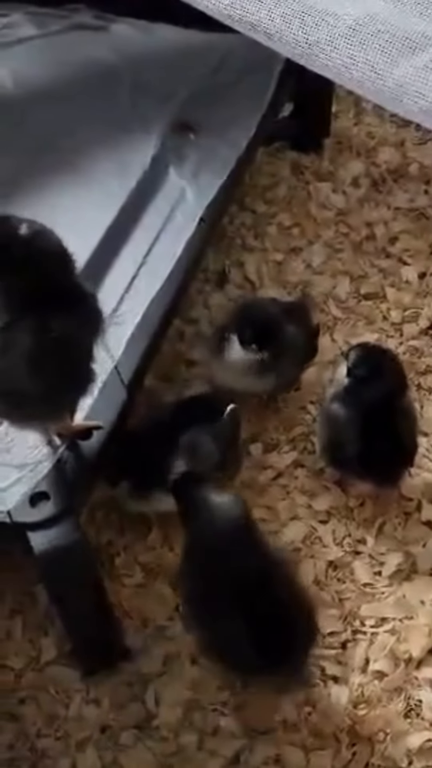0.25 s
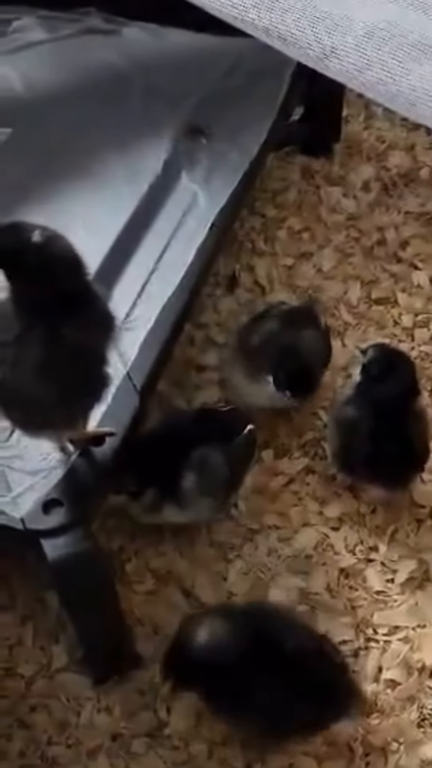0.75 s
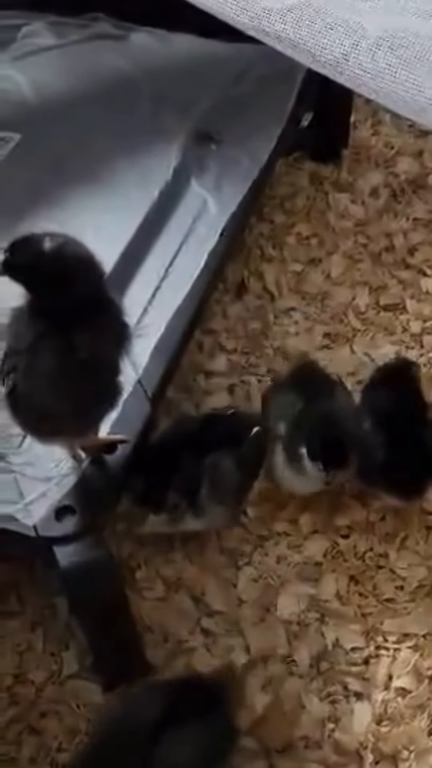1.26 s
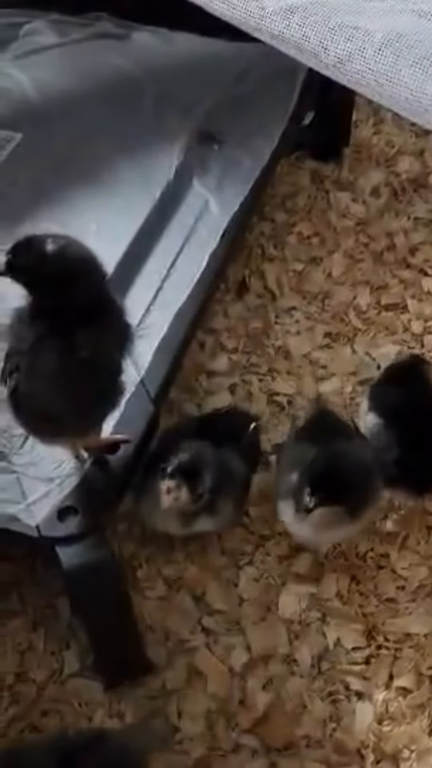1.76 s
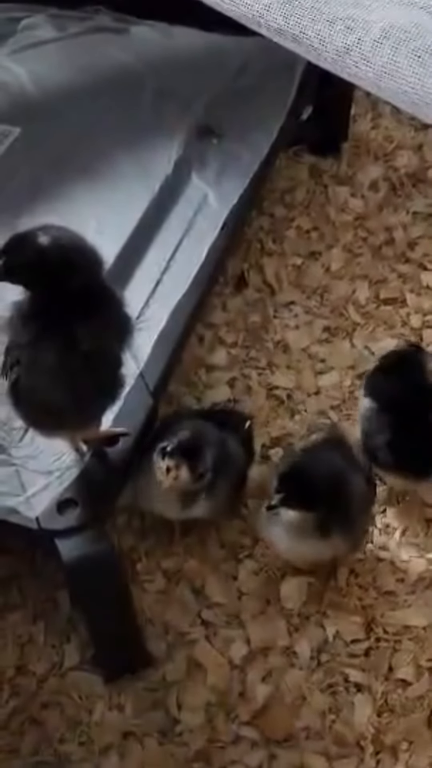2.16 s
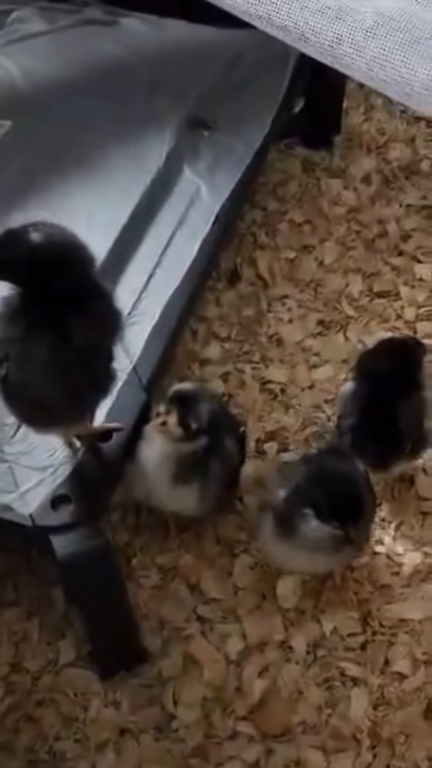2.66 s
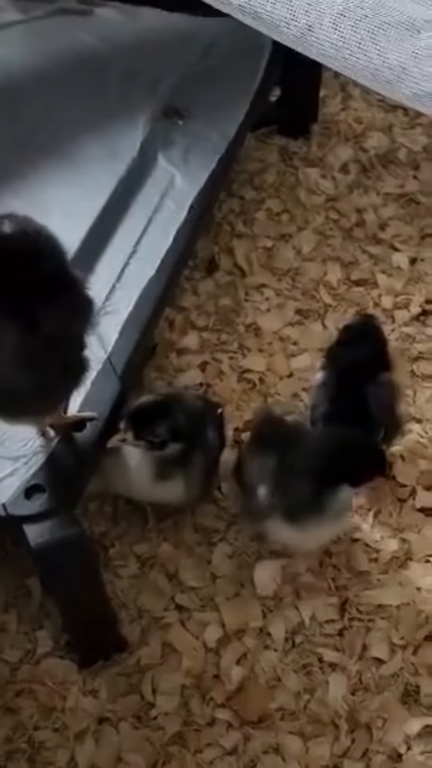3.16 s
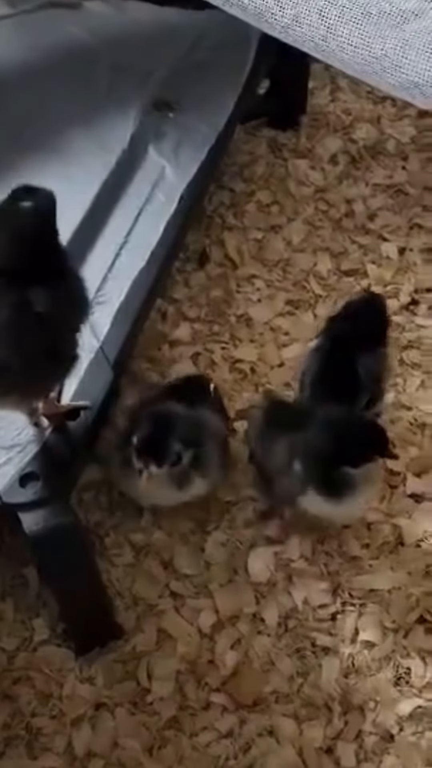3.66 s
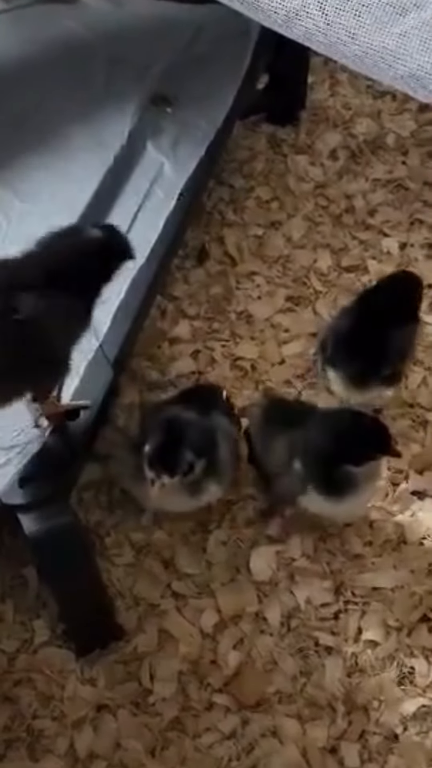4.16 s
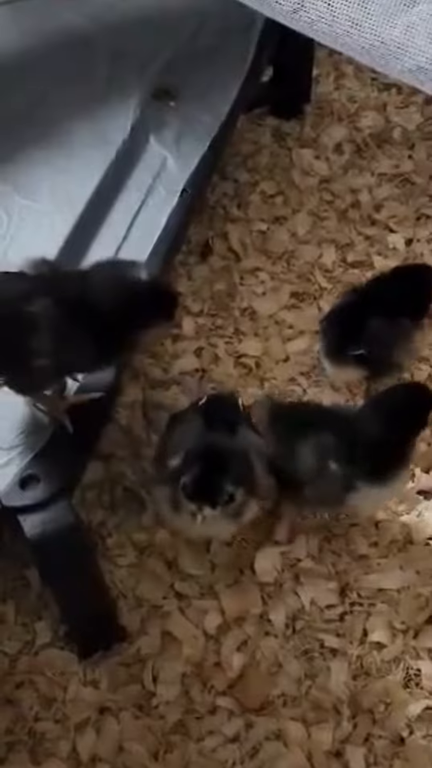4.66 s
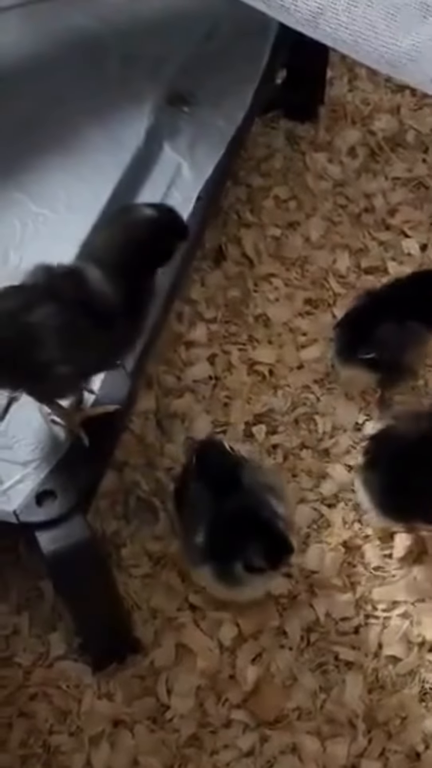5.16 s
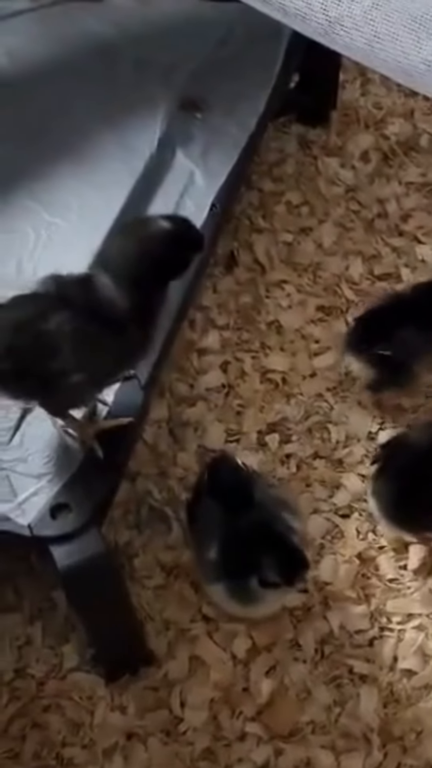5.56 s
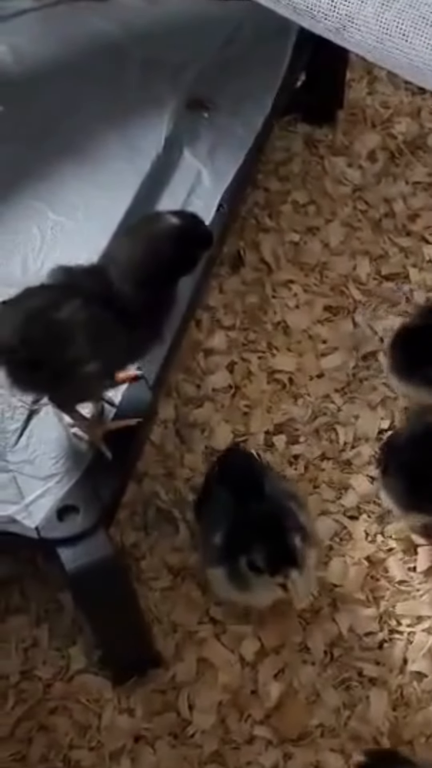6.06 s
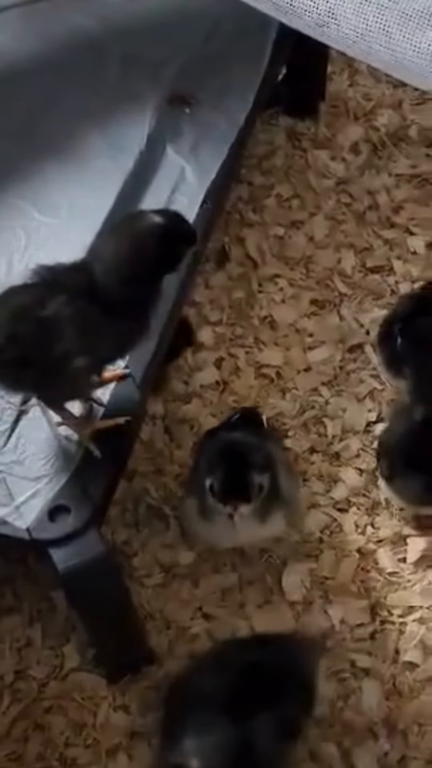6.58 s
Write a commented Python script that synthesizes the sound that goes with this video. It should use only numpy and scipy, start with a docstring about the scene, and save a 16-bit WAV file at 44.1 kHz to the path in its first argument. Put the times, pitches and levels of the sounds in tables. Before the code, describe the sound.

Heard close up in a brooder box, chicks give quick, high peeps while shuffling and pecking faintly in wood shavings. Then come several louder, sharp scratches and thin squeaks of claws sliding on a hard plate, with light ringing, one faint ting and a soft, deep bump. The chicks peep again before a second cluster of scrapes and dull bumps. A low room rumble and mains hum continue throughout.

```python
"""A room rumbles and hums with mains power while chicks shuffle in the wood shavings of a brooder box.
They peep in short, falling whistles and peck with tiny crunches. From about 2.7 s one chick slips on
the sloping heat plate: its claws squeal and scrape, and the plate rings. Soft, deep bumps and one
thin ting are heard too. The peeps return, and near 6 s the chick slips again."""
import sys
import numpy as np
from scipy import signal
from scipy.fft import rfft, irfft
from scipy.io import wavfile
from scipy.ndimage import uniform_filter1d

SR = 44100
rng = np.random.default_rng(int(sys.argv[2]) if len(sys.argv) > 2 else 0)


def store_wav(level_fs):
    """Save 16-bit WAV to argv[1]."""
    pcm = np.round(np.clip(np.atleast_2d(level_fs), -1, 1) * 32767)
    wavfile.write(sys.argv[1], SR, pcm.T.astype(np.int16))


N = 300762
TREBLE_LIMIT_HZ = 13130
# the tone colour of the scrapes and taps, bright with a dip near 3 kHz: (frequency [Hz], level [dB])
GRIT_SPECTRUM = [(150, -42.5), (600, -25.5), (1200, -15.5), (1900, -3.5), (2500, -6.5), (3050, -18.5),
                 (3500, -8), (4700, -6.5), (5700, -6.5), (7500, -.5), (9000, -3), (10500, -2), (12300, 5.5),
                 (13000, 3), (14000, 0)]


def amp(db):
    """Turns decibels into a number to multiply a sound by."""
    return 10 ** (np.asarray(db) / 20)


def unit(x):
    """Scales a signal so that its average strength (rms) is 1."""
    return x / np.sqrt(np.mean(x ** 2) + 1e-20)


def read(points, hz):
    """Looks up a (frequency, value) table, blending between rows on a scale of octaves."""
    row_hz, value = np.transpose(points)
    return np.interp(np.log(hz + 1), np.log(row_hz), value)


def add(mix, start_s, sound):
    """Adds a sound to the mix at a given time."""
    part = mix[max(round(start_s * SR), 0):][:len(sound)]
    part += sound[:len(part)]


def colour(x, points, tilt=0):
    """Gives x a tone colour at strength 1; tilt brightens it above 900 Hz, in dB per octave."""
    hz = np.fft.rfftfreq(len(x), 1 / SR)
    gain_db = read(points, hz) + tilt * np.log2(np.maximum(hz, 900) / SR)
    return unit(irfft(rfft(x) * amp(gain_db), len(x)))


def wander(n, rate_hz):
    """A random curve, roughly between -1 and 1, that heads for a new value rate_hz times a second."""
    return np.interp(np.arange(n) * rate_hz / SR, np.arange(1024), rng.standard_normal(1024))


def slips(per_s, spread_db, size=16384):
    """Tiny slips of one surface on another: random clicks of unequal strength."""
    happens = rng.random(size) < per_s / SR
    strength = np.minimum(rng.exponential(1, size), 4)
    sign = rng.choice([-1., 1.], size)
    return sign * happens * amp(spread_db * strength)


def room_noise(rumble_db=-44):
    """A low rumble, its bass alike in both ears, and a slightly wavering mains hum."""
    # the tone colour of the rumble: (frequency [Hz], level [dB])
    rumble_spectrum = [(20, -32.5), (45, -18), (70, -2.5), (84, -7), (103, 5), (122, -3), (140, -8.5),
                       (195, -21.5), (300, -14.5), (480, -22.5), (900, -27), (2000, -33.5), (5000, -50),
                       (13000, -79.5)]
    # how alike the rumble is in the two ears: (frequency [Hz], likeness [0-1])
    ear_likeness = [(30, 1), (120, 1), (280, 0.72), (550, 0.75), (1200, 0.0085), (5000, 0.031)]
    # the tones of the hum: (frequency [Hz], level [dB])
    hum_tones = [(120, -56.5), (239.5, -57.2), (360, -67)]
    hz, t = np.fft.rfftfreq(N, 1 / SR), np.arange(N) / SR
    left, other = rfft(rng.standard_normal((2, N)))
    likeness = read(ear_likeness, hz)
    right = likeness * left + np.sqrt(1 - likeness ** 2) * other
    rumble = unit(irfft(np.array([left, right]) * amp(read(rumble_spectrum, hz)), N))
    hum = np.zeros(N)
    for tone_hz, db in hum_tones:
        level = np.sqrt(2) * amp(db + 0.71 * wander(N, 1.8))
        hum += level * np.sin(2 * np.pi * tone_hz * t + 0.24 * wander(N, 2.9))
    return amp(rumble_db) * rumble + hum


def shuffle():
    """Wood shavings crackle softly under many small feet, a little louder on the right."""
    # how the shuffling swells and fades: (time [s], level [dB])
    activity = [(0.0, -67), (0.35, -61), (0.68, -73.5), (1.0, -62.5), (1.8, -71.5), (2.3, -66),
                (2.71, -73.5), (3.13, -58.5), (3.44, -57), (3.592, -52.5), (3.87, -67.5), (4.2, -73),
                (4.451, -68.5), (5.131, -56), (5.36, -74.5), (5.64, -62.5), (6.05, -52), (6.35, -51),
                (6.82, -63)]
    # the tone colour of the shavings: (frequency [Hz], level [dB])
    shavings = [(500, 6), (1500, -3), (3000, -1.5), (5000, -13.5), (7500, 2), (10000, -5.5), (12500, 2.5),
                (14000, -14.5)]
    times, db = np.transpose(activity)
    level = amp(np.interp(np.arange(N) / SR, times, db) + 2.6 * wander(N, 45))
    left, right = (colour(slips(per_s=1700, spread_db=2.9, size=N), shavings) for _ in range(2))
    return level * np.array([left + 0.052 * right, right + 0.048 * left]) * amp([[1.1], [3.1]])


def resonance(hz, centre_hz, width_hz):
    """How well a hollow space passes a pitch: 1 at its centre, less to either side."""
    return 1 / np.hypot(1, 2 * (hz - centre_hz) / width_hz)


def peep(length, top_hz, end_hz, db, hoarse):
    """A whistle flicks up, then slides down, loudest near the pitch that the beak favours."""
    attack_s, release_s, flutter_hz = 0.009, 0.012, 520
    crest = .19  # the pitch is highest at this share of the length
    t = np.arange(0, length, 1 / SR)
    n, progress = len(t), t / length
    flick = np.maximum(1 - progress / crest, 0) ** 2
    slide = np.sin(1.1 * np.maximum(progress - crest, 0) / (1 - crest)) ** 1.4
    hz = top_hz * (1 - .055 * flick) + (end_hz - top_hz) * slide / slide[-1]
    waver = 1 + .05 * hoarse * wander(n, 1100)
    phase = 2 * np.pi * np.cumsum(hz * waver) / SR
    fade = np.minimum(t / attack_s, 1) * np.minimum((length - t) / release_s, 1)
    swell = amp(progress - 1.5)  # grows by 1 dB
    beak = resonance(hz, centre_hz=3010, width_hz=2300)
    # the throat brings out the overtones; the highest peeps lose them
    overtone_db = -13 - .02 * max(top_hz - 3650, 0)
    throat = resonance(2 * hz, centre_hz=6600, width_hz=1500)
    overtones = np.sin(2 * phase) + amp(-15) * np.sin(3 * phase)
    tone = np.sin(phase) + amp(overtone_db) * throat * overtones
    # a second membrane makes a hoarse voice flutter
    membrane = np.sin(2 * np.pi * np.cumsum(flutter_hz * (1 + 0.3 * wander(n, 191))) / SR)
    rasp = unit(1 + hoarse * (.9 * wander(n, 650) + .5 * membrane))
    return amp(db) * fade * swell * beak / beak.max() * rasp * tone


def peeps(far_below_db=-46.5):
    """The chicks call: loud peeps come from the near end of the box, faint ones from the far end."""
    # the peeps: (time [s], length [s], top pitch [Hz], end pitch [Hz], level [dB], hoarseness [0-1])
    calls = [(0.138, 0.04, 3550, 2510, -39.5, 0.34), (0.289, 0.041, 3830, 2500, -42.5, 0.38),
             (0.421, 0.035, 3120, 2860, -46, 0.18), (0.545, .045, 3280, 2920, -45.5, 0.12),
             (0.688, .055, 3520, 2990, -43, .1), (0.876, .044, 3865, 2550, -37.5, .35),
             (0.994, 0.045, 3950, 2630, -38.5, 0.33), (1.125, 0.051, 4170, 2600, -39, 0.35),
             (1.233, .061, 2350, 2310, -54.5, 0.4), (1.452, 0.038, 4330, 3340, -37.5, 0.07),
             (1.477, 0.044, 3170, 2830, -48, .5), (1.601, 0.051, 4360, 3100, -35.5, 0),
             (1.761, 0.061, 2660, 2240, -48, 0.5), (1.888, 0.057, 3040, 2270, -49, 0.7),
             (2.019, 0.057, 4280, 2930, -37, 0.4), (2.026, 0.064, 3010, 2680, -47, 0.7),
             (2.167, 0.061, 4530, 2870, -35.5, 0.14), (2.686, .051, 4260, 2580, -36.5, 0.2),
             (4.375, 0.017, 3090, 2720, -50, 0.5), (4.609, 0.034, 2840, 2430, -43, 0.1),
             (4.7, 0.035, 3366, 2795, -33, 0.1), (4.818, 0.047, 3444, 2900, -33, 0.06),
             (4.864, .062, 2630, 2190, -56, 0.54), (4.959, 0.057, 3644, 3005, -33, 0.02),
             (4.982, 0.073, 2950, 2350, -48.5, 0.5), (5.078, 0.031, 3250, 3060, -51.5, 0.3),
             (5.246, 0.037, 3050, 2800, -54, 0.25), (5.374, 0.053, 3750, 3150, -49.5, 0.4),
             (5.57, 0.07, 2700, 2280, -49.5, 0.43), (5.708, 0.069, 2896, 2640, -47, 0.42),
             (5.881, 0.057, 3030, 2690, -44.5, 0.42)]
    near, far = np.zeros((2, N))
    for start, length, top_hz, end_hz, db, hoarse in calls:
        add(far if db < far_below_db else near, start, peep(length, top_hz, end_hz, db, hoarse))
    return near, far


def taps(soft_db=-37.5, hard_db=-28.5, ring_db=-4):
    """Beaks and feet crunch: soft taps land in the shavings, hard ones set the plate ringing."""
    # pecks and steps: (time [s], level [dB], decay time [s], brightness [dB per octave])
    pecks_and_steps = [(0.255, -50, 0.0039, -5), (0.424, -59.5, 0.05, -1.5), (2.032, -52.5, 0.041, -7.5),
                       (2.25, -41.5, 0.0057, -3.5), (2.461, -48.5, 0.0068, -20), (2.497, -62.5, 0.01, -1),
                       (2.733, -49.5, 0.014, 4), (2.815, -53, 0.0093, -7), (3.077, -31, 0.0062, 4),
                       (3.116, -40, 0.02, -3.5), (3.127, -24, 0.002, -13), (3.216, -36.5, 0.0027, -8),
                       (3.397, -34.5, 0.0044, -12), (3.595, -27.5, 0.0049, -8), (4.174, -49, 0.04, -5),
                       (4.574, -51, 0.025, -3.5), (5.106, -34.5, 0.0011, -4.5), (5.266, -53.5, 0.036, -5),
                       (5.447, -45.5, 0.0059, -15.5), (5.726, -47.5, 0.023, -4), (5.803, -41, 0.022, -6),
                       (5.91, -38, 0.011, -6), (5.935, -24, 0.0029, 14), (6.08, -31, 0.0044, -21),
                       (6.205, -33, 0.0064, -9), (6.494, -47.5, 0.04, -3), (6.631, -47.5, 0.015, 0)]
    out, on_plate = np.zeros((2, N))
    for start, db, decay, tilt in pecks_and_steps:
        grit = colour(slips(per_s=8200, spread_db=2.0), GRIT_SPECTRUM, tilt)
        crunch = amp(db) * grit * np.exp(-np.arange(len(grit)) / SR / decay)
        plate_share = np.interp(db, [soft_db, hard_db], [.1, 1])
        add(out, start, crunch)
        add(on_plate, start, plate_share * crunch)
    return out + amp(ring_db) * plate(on_plate)


def plate(drive):
    """The heat plate rings on at its own pitches after a tap or a scrape."""
    # the plate's ringing tones: (frequency [Hz], relative level [dB], time to fade by 60 dB [s])
    plate_tones = [(1334, -15, .06), (1707, -12, .07), (2046, -7.5, .22), (2595, -15.5, 0.086),
                   (3445, 3, 0.25), (3600, -1, .08), (4070, -7.5, .06), (4750, 1.5, 0.044),
                   (4900, -4.5, 0.076), (5390, 1.5, 0.098), (5900, -6.5, 0.051), (6220, 0.5, 0.066),
                   (6680, 5, 0.072), (7400, 5.5, 0.058), (7800, 1.5, 0.12), (8260, 10, 0.11),
                   (8840, -2.5, 0.055), (9580, 4, .09), (10170, -2, .42), (10340, 4, .11),
                   (10650, -1.5, 0.061), (11400, 3.5, .06), (11550, 3.5, .15), (11800, 0, 0.078),
                   (12280, 2, .06), (12900, 0.5, 0.079), (12910, 0, .06)]
    t = np.arange(SR) / SR
    ring = sum(amp(db - 60 * t / fade_s) / np.sqrt(fade_s) * np.sin(2 * np.pi * hz * t)
               for hz, db, fade_s in plate_tones)
    return signal.fftconvolve(drive, ring / np.linalg.norm(ring))[:N]


def squeals(pitch_jitter=.007, roughness=.25):
    """A claw sticks and slips so regularly that, for a moment, it makes an unsteady tone."""
    # the claw catches: (time [s], length [s], pitch [Hz], level [dB], overtone share [0-1])
    catches = [(2.713, 0.029, 2104, -40, 0.07), (2.9, 0.099, 2128, -23.5, 0.05),
               (2.93, 0.06, 1134, -40.5, 0.18), (2.893, .11, 11910, -33.5, 0),
               (2.905, .045, 11100, -38.5, 0), (2.912, 0.091, 12880, -29.5, 0),
               (3.395, .039, 11320, -25.5, 0), (3.396, 0.054, 12140, -25.5, 0),
               (3.415, .034, 3840, -31.5, 0), (3.419, .02, 7590, -19.5, 0), (3.595, 0.014, 4400, -33, 0),
               (3.607, .03, 4860, -33, 0), (3.61, 0.026, 12400, -32, 0.1),
               (3.638, 0.021, 3500, -30.5, 0.47), (4.187, 0.043, 8340, -18, 0.1),
               (4.207, 0.058, 3460, -25, 0.52), (4.227, 0.019, 7380, -21, 0),
               (5.917, 0.063, 12920, -24.5, 0), (5.937, 0.038, 2114, -38, .05),
               (6.013, 0.082, 3466, -35, .1), (6.022, 0.05, 4770, -36, 0.3), (6.208, .036, 11260, -26.5, 0),
               (6.209, 0.029, 12400, -22.5, 0), (6.224, 0.058, 3520, -34.5, .3),
               (6.23, .026, 5400, -37.5, 0), (6.282, .032, 3436, -27.5, 0.21),
               (6.283, 0.042, 8340, -32.5, 0), (6.284, .028, 10400, -25, 0)]
    out = np.zeros(N)
    for start, length, hz, db, share in catches:
        n = int(length * SR)
        phase = 2 * np.pi * np.cumsum(hz * (1 + pitch_jitter * wander(n, 900))) / SR
        overtones = sum(amp(read(GRIT_SPECTRUM, k * hz) - read(GRIT_SPECTRUM, hz)) * np.sin(k * phase)
                        for k in (2, 3) if k * hz < TREBLE_LIMIT_HZ)
        tone = np.sin(phase) + share * overtones
        flicker = 1 + roughness * wander(n, 400)
        add(out, start, amp(db) * tone * flicker * signal.windows.tukey(n, .45))
    return out


def contact(grit, ripple_db=5):
    """Each spot that a claw touches favours its own pitches, which shift as it slides on."""
    bands = signal.stft(grit, nperseg=512, noverlap=384)[2]
    ripple = uniform_filter1d(rng.standard_normal(bands.shape), size=2, axis=0)  # smooth over pitch
    ripple = uniform_filter1d(ripple, size=12, axis=1)  # and over time
    rippled = signal.istft(bands * amp(ripple_db * unit(ripple)), nperseg=512, noverlap=384)[1]
    return unit(rippled[:len(grit)])


def scrapes(claw_db=-5.5):
    """A sliding claw makes a dense run of tiny slips that set the plate ringing."""
    # claw strokes: (time [s], rise [s], hold [s], fall [s], level [dB],
    # brightness [dB per octave], plate ring relative to the level [dB])
    strokes = [(2.902, 0.016, 0.039, .01, -30, 4, -8.5), (2.948, 0.022, .02, .012, -30, -2, -8.5),
               (3.387, 0.02, 0.045, 0.017, -22.5, 1, -6.5), (3.482, 0.011, 0.044, 0.015, -28.5, -8, -20),
               (3.587, 0.005, 0.025, 0.006, -22, -2, -5.5), (3.613, 0.012, 0.017, 0.015, -15, 0, -4.5),
               (4.193, 0.012, 0.034, .0091, -20, 1.5, -3), (4.219, .0066, 0.035, 0.012, -17, -0.5, -4),
               (5.898, 0.0068, 0.015, 0.13, -36.5, -10.5, -3.5), (5.924, 0.0082, 0.0071, .008, -9, 19, -7),
               (5.94, .0036, .0051, .015, -28, 16, -14), (6.001, .025, 0.021, 0.035, -15.5, 0, -9.5),
               (6.207, 0.025, 0.013, 0.023, -21, -1, -4.5), (6.273, 0.0082, 0.02, 0.012, -27, -1, 1)]
    out, on_plate = np.zeros((2, N))
    for start, rise, hold, fall, db, tilt, ring_db in strokes:
        grit = colour(slips(per_s=5000, spread_db=1.0), GRIT_SPECTRUM, tilt)
        force = np.interp(np.arange(len(grit)) / SR, np.cumsum([0, rise, hold, fall]), [0, 1, 1, 0])
        level = amp(db) * force ** 1.58
        add(out, start, level * contact(grit))
        add(on_plate, start, amp(ring_db) * level * grit)
    return amp(claw_db) * out + plate(on_plate)


def bumps():
    """Soft, dull bumps of deep noise."""
    # the bumps: (time [s], length [s], level [dB])
    swells = [(3.049, 0.37, -49.5), (5.716, 0.52, -47), (6.4, 0.33, -49.5)]
    # the tone colour of a bump: (frequency [Hz], level [dB])
    bump_spectrum = [(15, 3), (32, -12), (60, -6), (130, -11.5), (400, -19), (1500, -62)]
    out = np.zeros(N)
    for start, length, db in swells:
        n = int(length * SR)
        deep_noise = colour(rng.standard_normal(SR), bump_spectrum)[:n]
        add(out, start, amp(db) * deep_noise * signal.windows.tukey(n, .7))
    return out


def ting(start_s=3.62, hz=3871, db=-45, fade_s=1.1):
    """A small metal part, knocked once, gives one thin, long ring."""
    out, t = np.zeros(N), np.arange(SR) / SR
    add(out, start_s, amp(db - 60 * t / fade_s) * np.sin(2 * np.pi * hz * t))
    return out


def box(x, left_db, lag_samples, echo_db, lag_top_hz=TREBLE_LIMIT_HZ):
    """Places a sound by the left ear's level and delay against the right; the walls add a short echo."""
    # how long the box echoes: (frequency [Hz], time to fade by 60 dB [s])
    echo_times = [(300, 0.057), (2000, 0.16), (4000, 0.22), (8000, 0.21), (13000, 0.18)]
    bounces = rng.standard_normal((2, SR // 2)) * (rng.random((2, SR // 2)) < 4000 / SR)
    bounces[:, :SR // 500] = 0  # no echo in the first 2 ms
    hz, t, bands = signal.stft(bounces, SR, nperseg=256)
    early_db = 2.5 * np.exp(-t / 0.033)  # the close walls answer first and loudest
    fade_db = 60 * t / read(echo_times, hz)[:, None]
    tail = signal.istft(bands * amp(early_db - fade_db), SR, nperseg=256)[1]
    tail /= np.linalg.norm(tail, axis=1, keepdims=True)
    echo = signal.fftconvolve(x[None], tail, axes=1)[:, :N]
    lag_hz = np.minimum(np.fft.rfftfreq(N, 1 / SR), lag_top_hz)  # the delay shrinks above lag_top_hz
    delay = np.exp(-2j * np.pi * lag_hz * lag_samples / SR)
    spectrum = rfft(x)
    direct = irfft(np.array([amp(left_db / 2) * delay * spectrum, amp(-left_db / 2) * spectrum]), N)
    return direct + amp(echo_db) * echo * amp([[-1.5], [1.5]])


def scene():
    """Chicks, claws, shavings and room together, in stereo."""
    # how the claws' sound differs between the ears: (frequency [Hz], left minus right [dB])
    claw_balance = [(300, 10), (1500, -9.5), (3000, -6), (5800, 3.5), (7000, -9), (9000, -0.5),
                    (10700, -20.5), (13000, -4)]
    left_db = read(claw_balance, np.fft.rfftfreq(N, 1 / SR))
    claws = box(scrapes() + taps(), left_db, lag_samples=9, echo_db=-3.5, lag_top_hz=4900)
    squeaks = box(squeals() + ting(), left_db, lag_samples=9, echo_db=-8.5, lag_top_hz=4900)
    near, far = peeps()
    chicks = box(near, left_db=-8, lag_samples=-15, echo_db=-8)
    chicks += box(far, left_db=-0.5, lag_samples=-15, echo_db=-8)
    return chicks + claws + squeaks + shuffle() + bumps() + room_noise()


def record(dry, limit_db=-11.5):
    """Turns the sound down briefly if the louder ear passes the limit, then cuts the highest treble."""
    power = abs(uniform_filter1d(dry ** 2, size=200, axis=1)).max(axis=0)
    excess = np.maximum(np.sqrt(power) / amp(limit_db), 1)
    held = dry / uniform_filter1d(excess, size=200)
    treble_cut = signal.firwin(511, TREBLE_LIMIT_HZ, window=("kaiser", 8), fs=SR)
    return signal.oaconvolve(held, treble_cut[None], "same")


dry = scene()
out = record(dry)
store_wav(out)
```